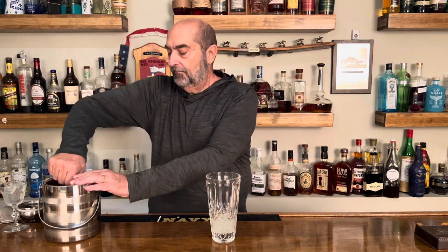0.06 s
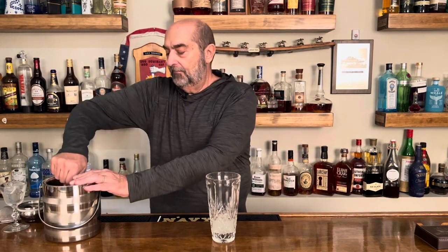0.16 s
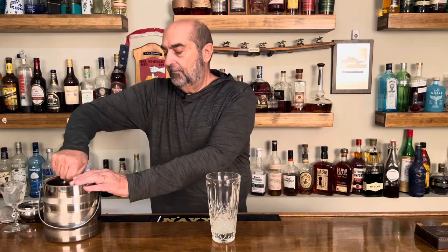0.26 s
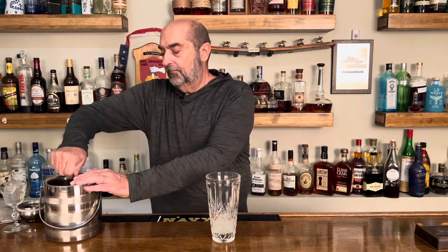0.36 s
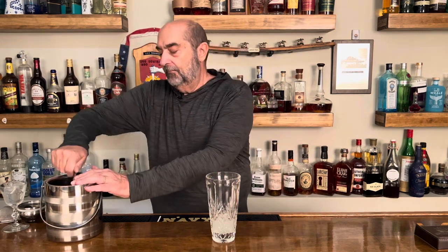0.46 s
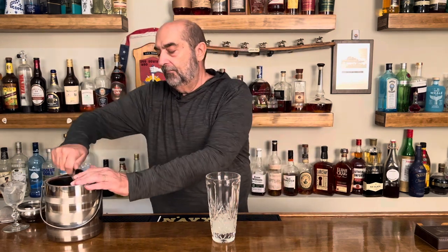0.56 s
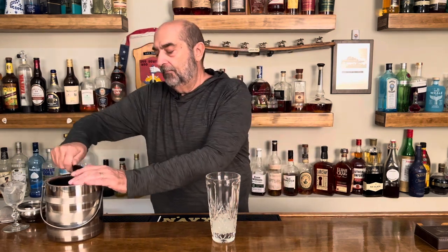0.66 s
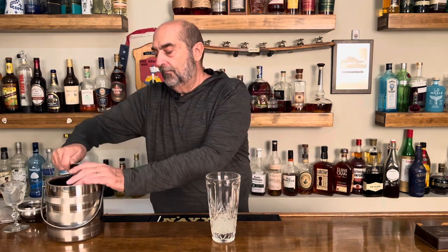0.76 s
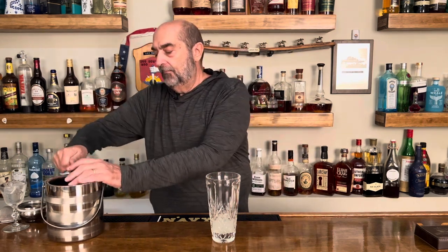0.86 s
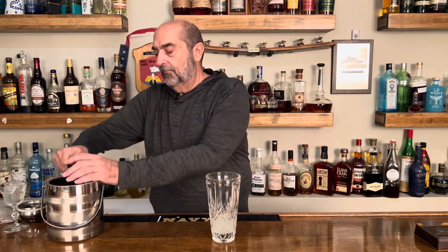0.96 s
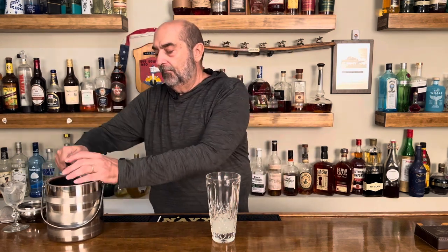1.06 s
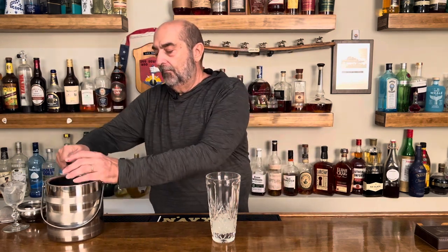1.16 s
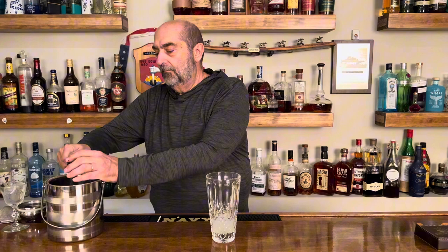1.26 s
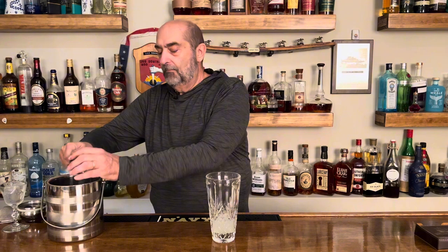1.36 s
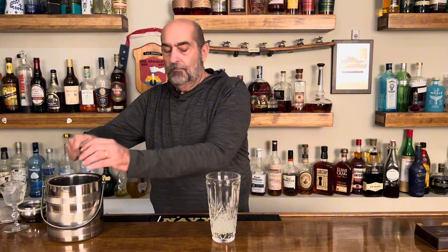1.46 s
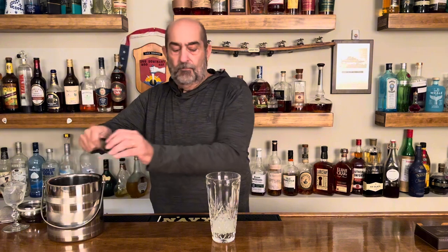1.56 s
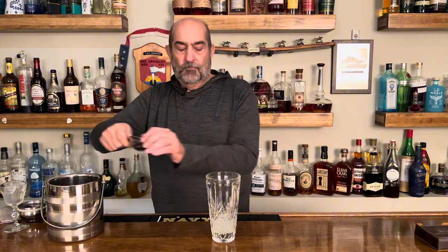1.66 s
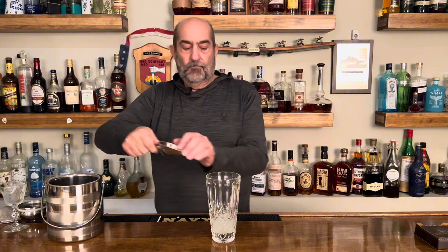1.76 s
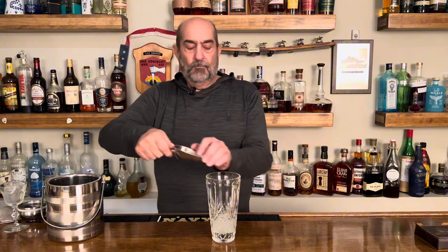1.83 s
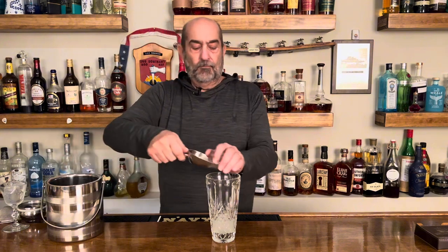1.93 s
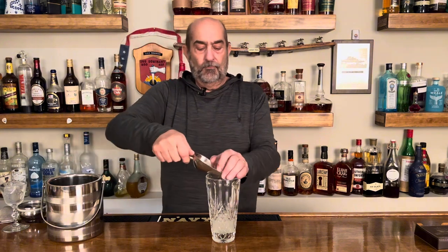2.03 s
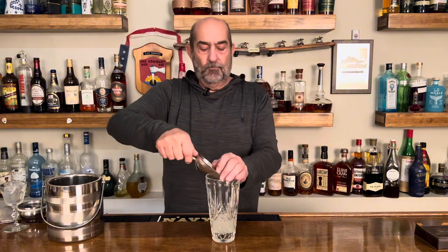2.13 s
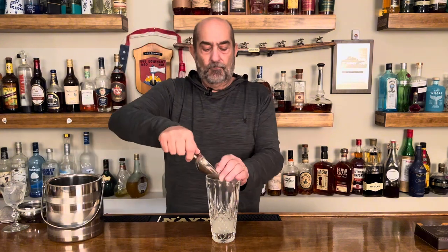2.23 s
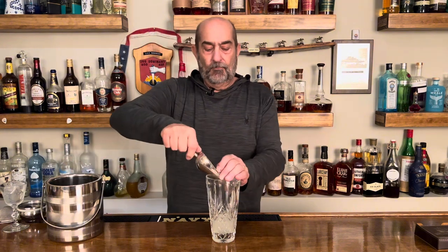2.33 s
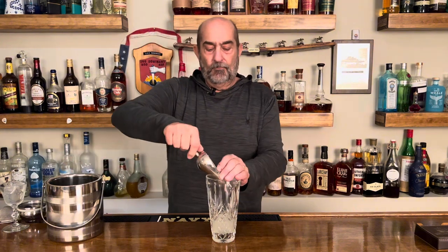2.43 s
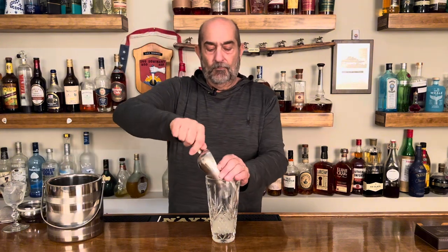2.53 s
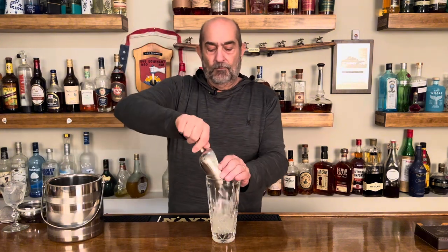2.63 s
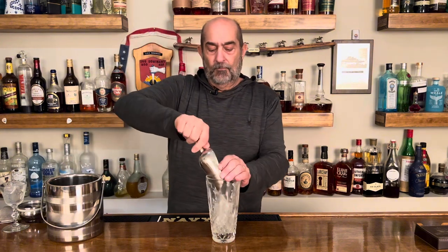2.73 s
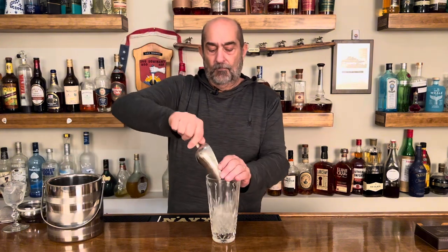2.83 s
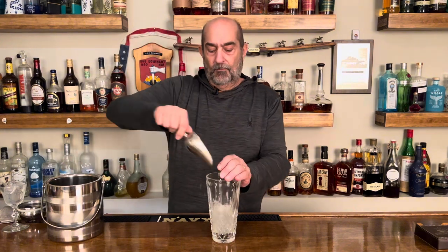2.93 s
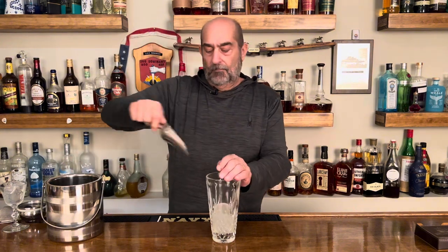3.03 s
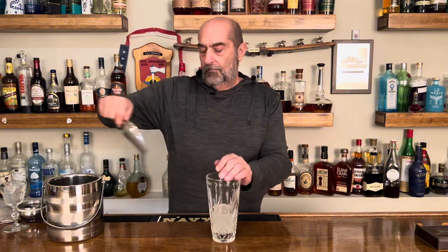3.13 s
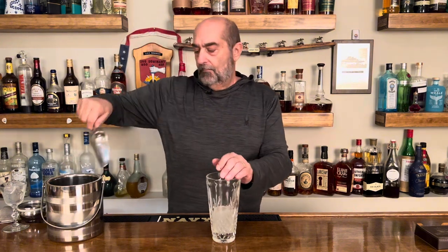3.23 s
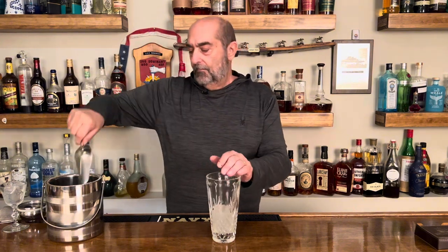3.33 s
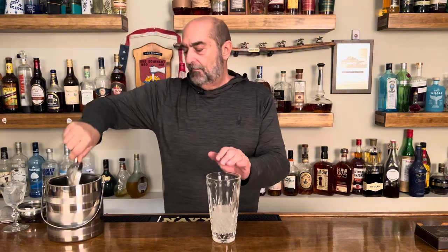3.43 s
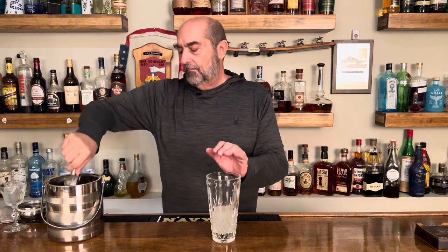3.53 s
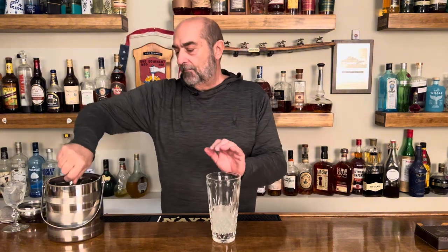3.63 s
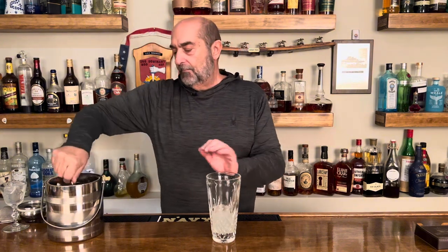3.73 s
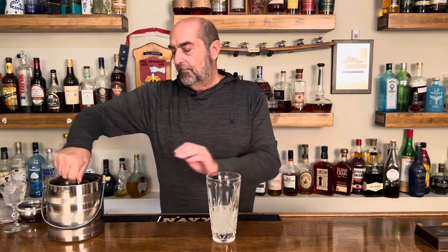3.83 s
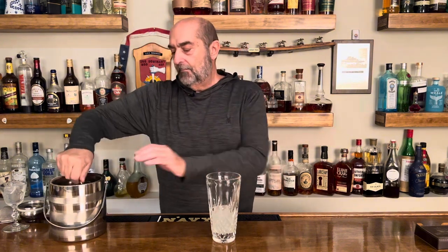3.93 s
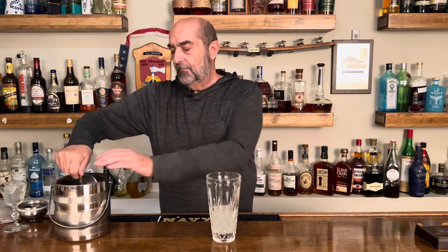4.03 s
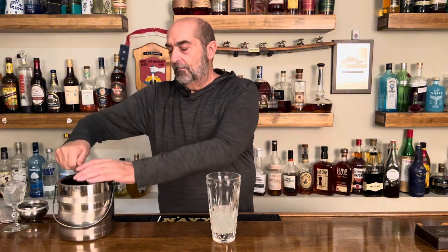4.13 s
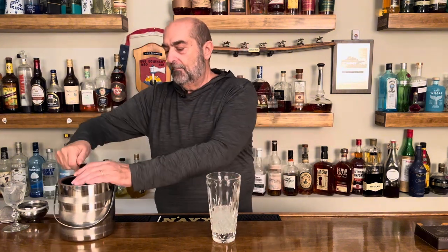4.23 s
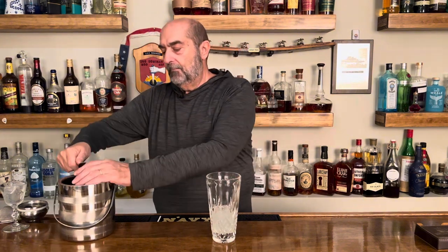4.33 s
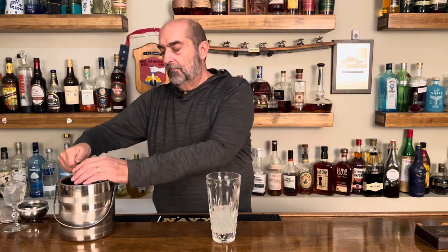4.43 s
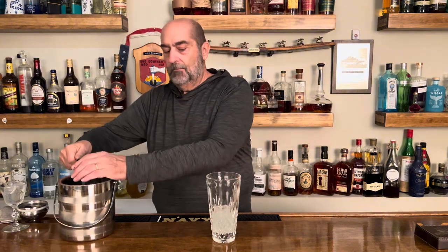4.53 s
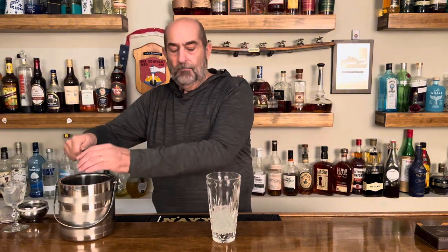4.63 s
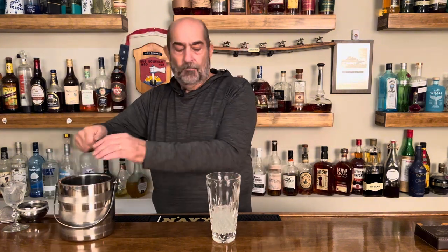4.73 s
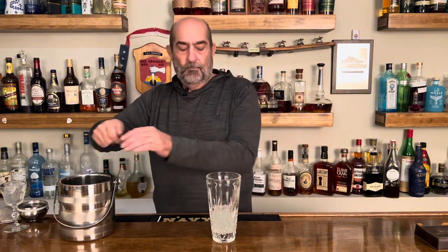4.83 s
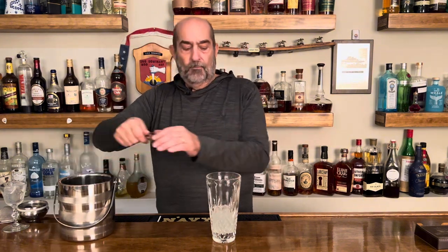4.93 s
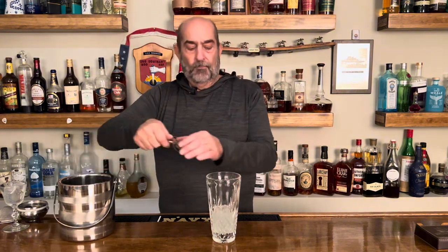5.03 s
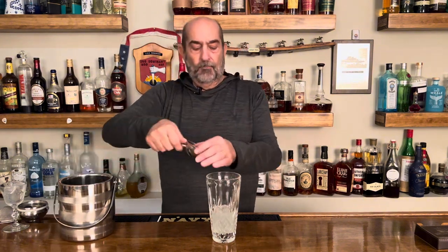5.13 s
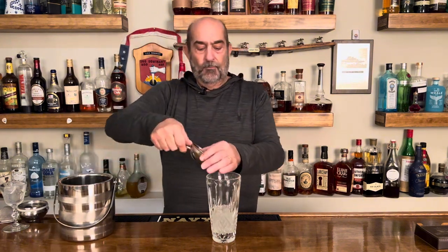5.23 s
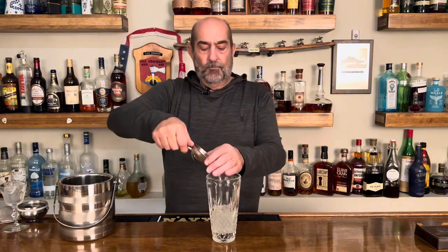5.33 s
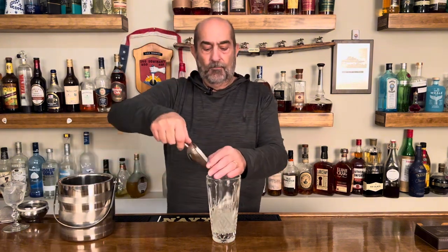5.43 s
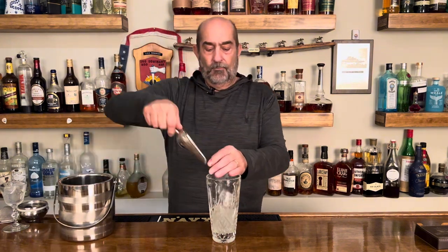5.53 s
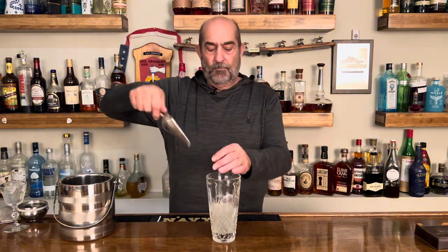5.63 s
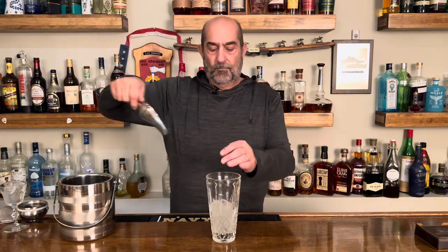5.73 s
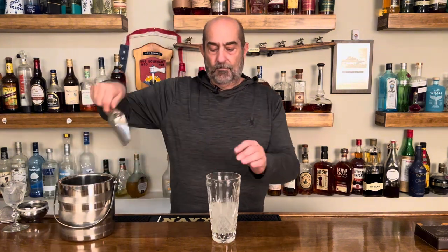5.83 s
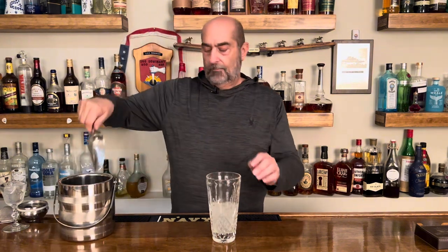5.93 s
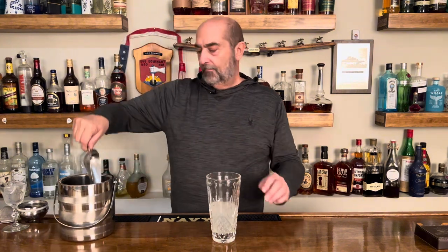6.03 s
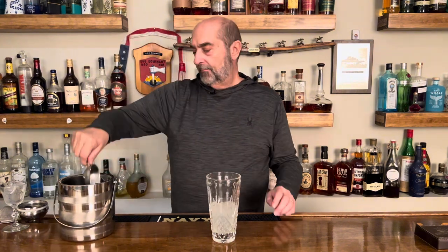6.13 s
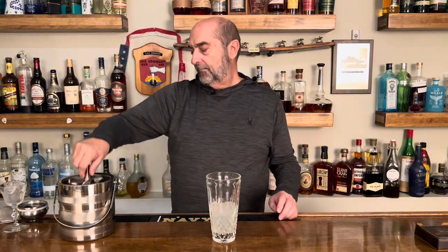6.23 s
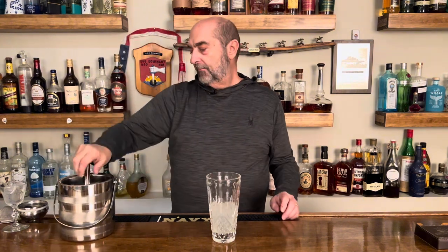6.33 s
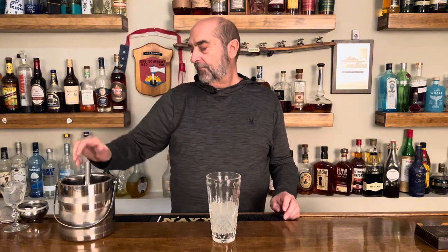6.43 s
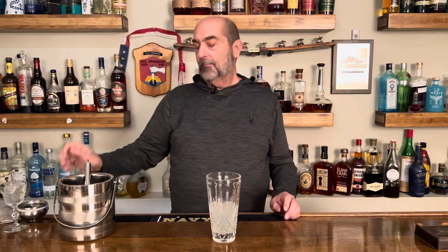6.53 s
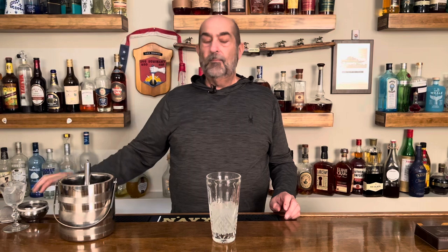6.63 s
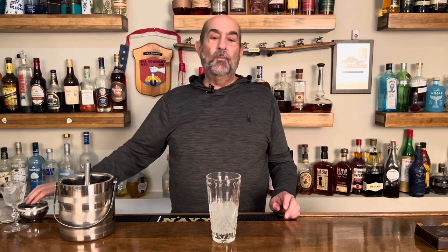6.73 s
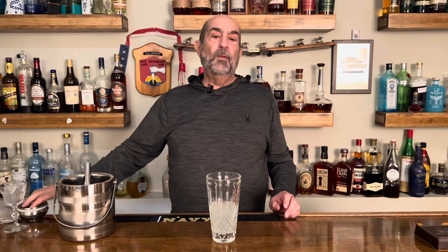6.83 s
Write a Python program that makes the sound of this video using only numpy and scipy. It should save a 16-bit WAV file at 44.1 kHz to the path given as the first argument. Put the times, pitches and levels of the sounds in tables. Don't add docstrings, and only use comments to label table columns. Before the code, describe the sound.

Ice cubes crack and rattle in a metal bucket off to one side, with low thuds through a wooden counter. After a short quiet swing, they slip off the scoop into a ringing glass almost in front. The dig and pour repeat, louder, then the steel scoop clatters into the bucket and rings briefly. Quiet room tone, short live echoes, two spaced microphones.

```python
import sys
import numpy as np
from scipy import signal
from scipy.fft import rfft, irfft, next_fast_len
from scipy.io import wavfile
from scipy.ndimage import map_coordinates

SR = 44100
rng = np.random.default_rng(int(sys.argv[2]) if len(sys.argv) > 2 else 0)


def attenuation_scalar(level_db):
    decades = np.asarray(level_db, float) / 20
    return 10 ** decades


def pcm_store(signal):
    levels = np.round(np.clip(np.atleast_2d(signal), -1, 1) * 32767)
    wavfile.write(sys.argv[1], SR, levels.astype(np.int16).T)


N = 303849
THUD_T60_S = 0.23
STEEPENS = 1.7
LATE_DB, LATE_T60_S = -27, 0.84
CEILING = .95

# t/s, crack level/dB, then clack and boom level/dB relative to the crack
FIRST_DIG = [(0.0014, -18.5, 0.5, 8), (0.0345, -40, 10, 13), (0.0826, -25, 1.5, 9),
             (0.1746, -25.5, 4.5, 12), (0.2474, -46, 19, 21), (0.3101, -37, 5, 3), (0.3441, -34, -4, -19.5),
             (.681, -25, -5, -9), (.6865, -21, -8, -12), (.702, -20.5, -16, -16.5), (.72, -27, -15, -18),
             (.745, -33.5, -10, -13), (1.062, -45, -9, -32), (1.073, -33.5, -9.5, -12),
             (1.2697, -62.5, 9.5, 18)]
SECOND_DIG = [(3.3999, -28, -7, -5), (3.474, -30, 0.5, 17), (3.495, -21.5, -9, -6),
              (3.5435, -21, -3.5, 7.5), (3.6026, -18, 3.5, -10.5), (3.6292, -22, -23, -5),
              (3.6897, -21, -7.5, -15), (3.716, -22, 4.5, -18), (3.7918, -16.5, -1.5, -18),
              (3.8185, -14.5, -8.5, -14.5), (3.8342, -19, -6, 2), (3.9214, -42.5, 0, 17),
              (3.9675, -34, 7.5, 13), (4.019, -35.5, 10, 9.5), (4.144, -35.5, 0.5, 4),
              (4.151, -23.5, -2.5, 2.5), (4.162, -28, -2, 2.5), (4.2578, -44.5, 13, 2),
              (4.337, -38.5, 5.5, -8), (4.3797, -24, -12.5, -20)]
SCOOP_DROP = [
    (6.0575, -28, -3, 3),
    (6.1865, -29.5, -4.5, 17),
    (6.2501, -13, -5, 11.5),
    (6.2782, -19.5, -35.5, -6.5),
    (6.3104, -22.5, -2.5, 11.5),
    (6.3327, -15.5, -2, -1.5),
    (6.3453, -14, -6.5, -12.5),
    (6.8154, -50.5, -15.5, -21.5),
    (6.8682, -33, 0, 10),
]
GLASS_HITS = [(2.129, -33, 4, 12), (2.2008, -40.5, 3.5, 7.5), (2.5031, -49.5, 2, -13),
              (2.554, -37, 5.5, -6), (2.593, -27.5, -19, -1), (2.609, -23.5, -3, -9),
              (2.6834, -48.5, 20, 5), (2.702, -50, 18, 8), (2.735, -52, 20, 8), (2.77, -55, 16, 8),
              (2.815, -54, 16, 5), (2.855, -56, 15, 5), (2.7187, -59.5, 30.5, 10), (2.751, -63, 25, 6),
              (2.7927, -35, 2, -24), (2.9002, -45.5, -2.5, -15), (2.927, -44.5, -13, -12),
              (3.0168, -69, 26, 29.5), (3.0794, -73, 33, 6), (5.2051, -57, 7, -12),
              (5.2611, -48, 7.5, -23.5), (5.3425, -27.5, -9.5, -9), (5.427, -17.5, -10, -17.5),
              (5.4703, -16.5, -25, -28), (5.5079, -24.5, -13, -19), (5.5503, -27, -6, -17),
              (5.5975, -38, 11.5, -6), (5.6702, -47, 12, 9), (5.7153, -51, 8.5, -2), (5.76, -58, 8, -0.5),
              (5.8076, -55, 5.5, -5), (2.0055, -65, 9.5, 0), (2.068, -69.5, 8, 0), (2.467, -63, -1, -10)]
# t/s, level/dB
BUCKET_THUDS = [(.0014, -22), (0.034, -37.5), (0.0813, -20), (3.4008, -33.5), (3.474, -19), (3.6063, -8.5),
                (3.6273, -20), (6.0584, -32.5), (6.1862, -21.5), (6.25, -14.5), (6.3113, -19.5),
                (6.3306, -25.5), (6.3454, -26), (6.8707, -41)]
GLASS_THUDS = [(2.004, -50.5), (2.129, -22), (2.2006, -27), (2.5053, -39.5), (2.594, -27.5),
               (2.6812, -22.5), (2.7196, -30.5), (5.343, -37.5), (5.427, -22.5), (5.5077, -23),
               (5.5506, -31), (5.597, -22), (5.7207, -38)]
# peak t/s, crunch level/dB, rise/s, fall/s (each over 20 dB), rumble level/dB relative
DIG_STROKES = [
    (.03, -35, 0.3, 0.37, 7.5),
    (.27, -39.5, 0.54, 0.1, -1),
    (3.612, -28.5, 0.11, 0.19, 6),
    (3.74, -29, .1, .1, -5),
    (3.82, -21.5, .07, .075, -9),
    (3.94, -35, .12, .15, -4),
    (4.15, -39.5, 0.033, 0.21, 0),
    (6.19, -33, .012, .2, 6.5),
    (6.29, -43.5, 0.099, 0.25, 10.5),
]
POUR_STROKES = [
    (2.73, -50, .2, 0.22, 7),
    (5.34, -48.5, 0.13, 0.18, -14),
    (5.5, -40, 0.15, 0.18, -4),
    (5.558, -36, .2, .07, -15),
    (5.74, -50, .08, .14, -8),
]
# t/s, f/Hz, level/dB, t60/s,
# damped after/s
BUCKET_NOTES = [(.002, 513, -16.5, .11, .025), (0.28, 510, -24.5, 0.18, .042), (.175, 1248, -27.5, .2, .15),
                (1.073, 3720, -39, 0.046, .015), (1.073, 4930, -32.5, 0.042, .02),
                (1.073, 5400, -33, .03, .02), (.687, 3670, -20, .08, .03), (3.40, 3670, -42, .25, .06),
                (3.40, 4880, -40, 0.14, .06), (3.40, 5600, -37.5, 0.22, .07), (3.40, 8900, -44, .4, .08),
                (3.612, 1800, -20.5, .12, .04), (3.72, 1960, -23, 0.44, .08), (3.565, 500, -19.5, .15, .03),
                (3.905, 715, -28.5, 0.27, .05), (3.40, 715, -28, 0.25, 0.081),
                (3.40, 1670, -31.5, 0.24, 0.035), (3.604, 515, -5, 0.3, .04), (3.625, 1485, -11, 0.11, .2),
                (3.69, 568, -9.5, 1.8, .03), (3.72, 1260, -21.5, 0.49, 0.14), (3.82, 2036, -21, 0.39, 0.51),
                (3.828, 517, -13, 0.17, .07), (4.381, 4680, -26.5, 0.045, .1),
                (6.057, 5600, -46.5, 0.62, .1), (6.186, 570, -26.5, 0.86, .045), (6.251, 545, 2, 0.04, .27),
                (6.31, 538, -17, 0.21, 0.047), (6.338, 1705, 0, 0.25, 0.082), (6.42, 1707, -27, .33, .18),
                (6.36, 1950, -20, 0.29, .2), (6.252, 950, -15, .1, .02), (.002, 1250, -24, .15, 0.047),
                (.17, 3650, -28, 0.14, .03), (4.15, 530, -25.5, 0.16, 0.035), (4.26, 2200, -34, .3, .04),
                (6.333, 715, -9.5, 0.17, .07), (3.545, 550, -17, 0.17, .06), (6.869, 1140, -21, .06, .03)]
GLASS_NOTES = [(2.129, 1584, -27, 0.11, .025), (2.554, 2262, -21.5, .36, .1), (2.554, 2334, -20.5, .2, .08),
               (2.554, 2460, -21, .15, .06), (2.554, 4793, -28, 0.093, .05), (2.554, 5750, -34.5, .15, .05),
               (2.607, 2297, -19.5, 0.19, 0.02), (2.684, 2800, -22, 0.043, .15),
               (2.718, 1330, -27, 0.12, .015), (2.74, 1350, -26.5, .1, .01), (2.756, 563, -27, .15, .03),
               (2.79, 5400, -36, 0.099, .05), (2.64, 5100, -38.5, 0.24, .12), (2.70, 1400, -30, .2, 0.018),
               (2.69, 1650, -31, 0.11, .03), (2.84, 1610, -36, .1, .03), (3.013, 2310, -48, 0.46, 0.067),
               (3.08, 4750, -45, 0.056, .04), (3.08, 2315, -40, .15, .1), (2.895, 688, -35, 0.2, 0.22),
               (3.016, 670, -20, 0.69, .01), (3.034, 702, -32.5, 0.45, .04), (3.034, 650, -33.5, .4, 0.038),
               (3.12, 680, -41, 0.37, 0.054), (3.09, 2248, -39, 0.19, 0.083), (5.345, 2236, -21.5, 1.4, .3),
               (5.345, 2300, -16.5, 1.8, .19), (5.345, 5740, -20, 0.19, .07), (5.345, 5830, -29, 0.17, .05),
               (5.47, 5620, -31, .3, 0.05), (5.345, 10000, -27, .3, .074), (5.47, 8700, -37, 0.34, .08),
               (5.67, 3050, -41, .06, .02), (5.60, 2650, -31, 0.11, .04), (5.555, 2310, -14, 0.22, .5),
               (5.60, 850, -22, 0.087, 0.11), (5.72, 2250, -41.5, .4, .15),
               (2.129, 2300, -33, .12, .03), (2.129, 2780, -37, 0.13, .05), (2.129, 5114, -38, 0.13, .08),
             (2.129, 5700, -35.5, 0.32, 0.11), (2.129, 730, -33, .15, .04), (2.2008, 2304, -38, .15, .03),
             (2.2008, 519, -33, .2, .05)]
# f/Hz, level/dB, t60/s
SCOOP_RING = [(2848, -44, 1.4), (4060, -62, 1.1), (5036, -50, .6), (5647, -50, .75), (3512, -55, .55),
              (6855, -54, .5), (8333, -52, .35)]
# t/s, level/dB, damped after/s, pitch ratio as the load leaves
SCOOP_STRUCK = [
    (.685, 0, .38, 1),
    (4.381, -12, .3, 1),
    (6.34, 4, .5, 1.004),
]
# t/s, level/dB, contact time/ms
BUCKET_TAPS = [(.004, -14, .3), (3.4745, -22, .3), (3.6055, -12.5, 0.23), (3.8045, -14.5, .04),
               (3.824, -14, .04), (4.152, -20.5, .1), (4.381, -22, .04), (4.563, -50, .03),
               (6.2505, -8, 0.33), (6.3335, -7.5, .13)]
GLASS_TAPS = [(2.129, -20, .15), (2.554, -12, .09), (2.589, -28.5, .08), (2.607, -22, .06),
              (2.642, -28, .07), (2.6835, -25, .1), (3.0795, -36, .08), (5.2625, -30, .06),
              (5.3425, -18, .07), (5.428, -21, .06), (5.472, -19, .05), (5.509, -24, .2),
              (5.5525, -13.5, .06), (5.566, -23.5, .03), (5.601, -21, .15), (5.669, -30.5, .05)]
# peak t/s, level/dB, rise/s, fall/s
SLIDE = [(.66, -55.5, 0.34, 0.039), (1.304, -62, 0.17, 0.05), (1.8, -66.5, 0.42, 0.035),
         (1.866, -67, .02, 0.066), (2.006, -69, .01, 0.12), (4.766, -65.5, 0.23, 0.064),
         (5.044, -50.5, 0.072, 0.18), (5.286, -47, 0.1, 0.047), (6.86, -61, .06, 0.62)]
SLEEVE = [
    (.62, -58.5, 0.14, 0.09),
    (1.74, -66.5, 0.55, 0.13),
    (4.66, -69.5, 0.201, 0.26),
    (5.208, -54, 0.0032, .012),
]
# f/Hz, width/Hz, level/dB
BUCKET = [(1379, 350, -10.5), (1515, 73, -2), (1696, 51, 5.5), (2022, 110, 8.5), (2477, 24, -23),
          (2847, 100, -5.5), (3507, 140, -9), (3800, 110, -4), (4700, 38, -23), (4980, 60, -12),
          (5550, 60, -17.5), (6650, 40, -13.5), (8360, 90, -12)]
GLASS = [(489, 21.3, -6), (1330, 150, -24.5), (1580, 95, -27), (2300, 22, 2), (2533, 83, -1),
         (2800, 87, -17), (4945, 74, -13.5), (5780, 140, -11), (8600, 60, -32)]
COUNTER = [(59, 130, -4.5), (106, 15, 3.5), (148, 16.7, 3.5), (193.2, 29.4, 4), (241.4, 56, -4.5),
           (370, 40, -3), (503.7, 96, -3.5), (717, 4.7, -5)]
# low f/Hz, high f/Hz
BANDS = [(2800, 16000), (850, 2800), (380, 850), (70, 380)]
# f/Hz, level/dB per Hz
DIG_COLOUR = [(410, -28.5), (700, -3), (1010, -4), (1500, -4), (5690, 2), (11400, -14), (13000, -8.5),
              (16000, -34)]
POUR_COLOUR = [(410, -63), (700, -0.5), (1300, -10), (1600, 2), (4990, 0.5), (8650, -18), (10700, -32),
               (16000, -49)]
SCOOP = [(240, -77), (500, -41), (791, -23), (1660, -2), (5600, -27.5), (10600, -52), (11600, -36),
         (15000, -45)]
CLOTH = [(1500, -32), (5000, 0), (14000, 1.5)]
# f/Hz, level/dB
LEFT = [(200, -6), (1000, 10.5), (2500, -2), (5000, 20), (9000, 5.5), (13000, 4.5)]
GLASS_LEFT = [(200, -3.5), (700, 2.5), (1300, 4), (2300, -1.5), (5000, 13.5), (9000, 4), (13000, 2.5)]
# f/Hz, t60/s
ROOM = [(120, 0.14), (500, 0.33), (2000, 0.31), (6000, 0.34), (14000, 0.15)]
# f/Hz, level/dB per Hz
AIR = [(35, -18), (60, 5.5), (110, 0), (170, -7.5), (300, -12.5), (650, -25), (2000, -28), (3200, -36)]
AIR_TOP = [(3200, 0), (5000, -4), (8000, -10), (10000, -16), (12500, -14), (16000, -28)]
# f/Hz, likeness (1 = same)
AIR_ALIKE = [(60, 0.37), (180, 0.46), (550, -0.4), (1650, -0.24), (4970, -0.66), (15000, 1)]
# f/Hz, level/dB
HUM = [(119, -54), (160, -78.5), (900, -75)]
# f/Hz, level/dB
MIC = [(30, -14), (90, -4), (9900, 1), (10150, -13.5), (10900, -17.5), (11200, 2), (14500, 5.5), (15300, 2),
       (16400, -24.5)]
WIDTH = [(60, -8.5), (150, -9.5), (300, 0), (2000, 2), (9000, -0.5), (11000, 11), (13000, -9.5)]


def blows(hits, thuds, modes, ring_db, damping, dull_hz, crack_t60):
    bands, rings, t = np.zeros((4, N)), np.zeros(N), np.arange(SR // 4) / SR
    hz, width, level = np.transpose(modes)[:, :, None]
    t60 = 2.2 / (damping * np.clip(width, 30, 90))
    swell = 1 - np.exp(-t / .002)
    for s, db, clack_db, boom_db in hits:
        for band, rel_db, slower in zip(bands, (0, clack_db, boom_db), (1, 1.3, 2.2)):
            fall = attenuation_scalar(db + rel_db - 60 * t / (slower * crack_t60))
            add(band, s, fall * swell * rng.standard_normal(len(t)))
        push = along([(600, boom_db), (1500, clack_db), (4000, 0.031)], hz) + rng.normal(0, 3.1, hz.shape)
        wander = .085 * np.cumsum(rng.standard_normal((len(hz), len(t))), axis=1)
        strength = attenuation_scalar(db + ring_db + .5 * level + push - 60 * t / t60)
        add(rings, s, np.sum(strength * np.sin(2 * np.pi * hz * t + wander), axis=0))
    for s, db in thuds:
        add(bands[3], s, attenuation_scalar(db - 60 * t / THUD_T60_S) * swell * rng.standard_normal(len(t)))
    bands[0] = filtered(bands[0], lambda f: 0.92 / (1 + 1j * f / dull_hz))
    bands[2:] = filtered(bands[2:], resonances(COUNTER))
    total = rings
    for (low, high), band in zip(BANDS, bands):
        band_pass = signal.butter(2, (low, high), "band", fs=SR, output="sos")
        total = total + np.sqrt(SR / 2 / (high - low)) * signal.sosfilt(band_pass, band)
    return total


def crunch(rows, colour, modes, per_second, spread_db, ring_db):
    force = strokes(rows)
    sizes = attenuation_scalar(np.minimum(spread_db * rng.exponential(size=N), 12))
    ticks = (rng.random(N) < per_second / SR) * sizes
    grains = unit(signal.lfilter([1], [1, -.99], ticks) * rng.standard_normal(N))
    rattle = grains + .6 * unit(clinks(count=2400))
    vessel = resonances(modes)
    high = unit(filtered(rattle, lambda f: attenuation_scalar(along(colour, f)) * (1 + attenuation_scalar(ring_db) * vessel(f))))
    low = unit(filtered(grains, resonances(COUNTER)))
    rumble = attenuation_scalar(np.transpose(rows)[4])[:, None] * force
    return force.max(axis=0) * high + rumble.max(axis=0) * low


def clinks(count):
    start, pitch, size = rng.random((count, 3)).T[:, :, None]
    k = np.arange(2048)
    hz = 600 * 10 ** pitch
    tones = attenuation_scalar(-14 * size - 60 * k / SR / .05) * np.sin(2 * np.pi * hz * k / SR)
    return np.bincount(((start * N).astype(int) + k).ravel(), tones.ravel(), N)[:N]


def notes(rows, attack_s, blur):
    out, t = np.zeros(N), np.arange(SR // 2 + 4000) / SR
    for s, hz, db, t60, held in rows:
        fall = 60 * t / t60 + 60 * np.maximum(t - held, 0) / 0.043
        knots = 20 + int(hz ** 2 / 1e5)
        drift = wobble(count=len(t), knots=knots) + 1j * wobble(count=len(t), knots=knots)
        neighbours = blur * min(1 + (hz / 2500) ** 2, 4) ** .5 * drift
        tone = np.imag((1 + neighbours) * np.exp(2j * np.pi * hz * t))
        add(out, s, attenuation_scalar(db - fall) * (1 - np.exp(-t / attack_s)) * tone)
    return out


def scoop_ring():
    rows = []
    for s, db, held, ratio in SCOOP_STRUCK:
        for hz, level, t60 in SCOOP_RING:
            rows.append((s, ratio * hz, db + level, t60, held))
    return notes(rows, attack_s=.006, blur=.07)


def taps(rows):
    out = np.zeros(N)
    for s, db, contact_ms in rows:
        u = np.arange(256) / SR / (contact_ms / 1000)
        add(out, s, attenuation_scalar(db) * (1 - u) * np.exp(-u) * np.minimum(4 * u, 1))
    return out


def slide(rows, colour):
    flutter = attenuation_scalar(1.9 * wobble(count=N, knots=280))
    hiss = unit(filtered(rng.standard_normal(N), lambda f: attenuation_scalar(along(colour, f))))
    return strokes(rows).max(axis=0) * flutter * hiss


def bucket():
    clatter = blows(FIRST_DIG + SECOND_DIG + SCOOP_DROP, BUCKET_THUDS, BUCKET,
                    ring_db=-6.5, damping=1.04, dull_hz=9600, crack_t60=0.058)
    clatter = clatter + crunch(DIG_STROKES, DIG_COLOUR, BUCKET, per_second=700, spread_db=-5.0, ring_db=7.5)
    tones = notes(BUCKET_NOTES, attack_s=.0012, blur=.18) + taps(BUCKET_TAPS)
    return placed(clatter, tones, LEFT, lead_s=.00018, wet_db=3.5, tone_share=.25)


def glass():
    clatter = blows(GLASS_HITS, GLASS_THUDS, GLASS, ring_db=-0.5, damping=0.97, dull_hz=5400, crack_t60=0.048)
    clatter = clatter + crunch(POUR_STROKES, POUR_COLOUR, GLASS, per_second=620, spread_db=0.0, ring_db=-28)
    clatter = clatter + slide(SLIDE, SCOOP) + slide(SLEEVE, CLOTH)
    tones = notes(GLASS_NOTES, attack_s=.001, blur=.16) + scoop_ring() + taps(GLASS_TAPS)
    return placed(clatter, tones, GLASS_LEFT, lead_s=.00005, wet_db=2.5, tone_share=0.33)


def placed(clatter, tones, left, lead_s, wet_db, tone_share):
    side = np.array([[.5], [-.5]])
    pair = lambda f: attenuation_scalar(side * along(left, f)) * np.exp(2j * np.pi * f * side * lead_s)
    return filtered(clatter + tones, pair) + room(clatter + tone_share * tones, wet_db)


def room(x, wet_db):
    out, hop = np.zeros((2, N + 2 * SR)), 8192
    fade = np.hanning(2 * hop + 1)[:-1]
    padded = np.pad(x, (hop, 2 * hop))
    for k in range(0, N + hop, hop):
        hz, t, z = signal.stft(rng.standard_normal((2, SR // 2)), SR, nperseg=256)
        decay = attenuation_scalar(-60 * t / along(ROOM, hz)[:, None]) + attenuation_scalar(LATE_DB - 60 * t / LATE_T60_S)
        tail = signal.istft(z * decay, SR, nperseg=256)[1]
        tail[0] += 0.091 * tail[1]
        tail = tail / np.linalg.norm(tail, axis=1)[:, None]
        wet = signal.fftconvolve((fade * padded[k:k + 2 * hop])[None], tail, axes=1)
        out[:, k:k + wet.shape[1]] += wet
    return attenuation_scalar(wet_db) * out[:, hop - 130:hop - 130 + N]


def kitchen_air():
    turn = lambda f: np.arccos(np.clip(along(AIR_ALIKE, f), -1, 1)) / 2
    colour = lambda f: attenuation_scalar(along(AIR, f) + along(AIR_TOP, f))
    noise = rng.standard_normal((2, N))
    mid, side = filtered(noise, lambda f: colour(f) * np.array([np.cos(turn(f)), np.sin(turn(f))]))
    slow_swell = attenuation_scalar(1.2 * wobble(count=N, knots=24))
    t = np.arange(N) / SR
    hum = np.zeros(N)
    for hz, db in HUM:
        level = attenuation_scalar(db + 2.5 * wobble(count=N, knots=80))
        hum += level * np.sin(2 * np.pi * hz * t + .6 * wobble(count=N, knots=80))
    return attenuation_scalar(-53) * slow_swell * unit(np.array([mid + side, mid - side])) + hum


def strokes(rows):
    peak_s, db, rise_s, fall_s = np.transpose(rows)[:4, :, None]
    late = np.arange(N) / SR - peak_s
    return attenuation_scalar(db - 20 * np.maximum(late / fall_s, -late / rise_s) ** STEEPENS)


def resonances(peaks):
    def response(f):
        total = 0
        for k, (centre, width, db) in enumerate(peaks):
            loss = 1j * f * width
            total = total + (-1) ** k * attenuation_scalar(db) * loss / (centre * centre - f * f + loss)
        return total
    return response


def filtered(x, response):
    m = next_fast_len(N + SR // 2)
    return irfft(rfft(x, m) * response(np.fft.rfftfreq(m, 1 / SR)), m)[..., :N]


def along(points, hz):
    f, v = np.transpose(points)
    return np.interp(np.log(hz + 1), np.log(f + 1), v)


def wobble(count, knots):
    return map_coordinates(rng.standard_normal(knots + 4), [np.linspace(0, knots, count)])


def unit(x):
    return x / np.sqrt(np.mean(x ** 2) + 1e-20)


def add(track, s, piece):
    part = track[round(s * SR):][:len(piece)]
    part += piece[:len(part)]


def scene():
    return attenuation_scalar(-4.0) * (bucket() + glass()) + kitchen_air()


def low_pass(x):
    return signal.sosfilt(signal.butter(12, 16540, fs=SR, output="sos"), x)


def record(dry):
    middle_and_side = np.array([dry[0] + dry[1], dry[0] - dry[1]]) / 2
    widen = lambda f: np.array([np.ones_like(f), attenuation_scalar(along(WIDTH, f))])
    mid, side = filtered(middle_and_side, lambda f: attenuation_scalar(along(MIC, f)) * widen(f))
    pair = np.array([mid + side, mid - side])
    mix = pair / (1 + np.abs(pair / CEILING) ** 6) ** (1 / 6)
    return low_pass(mix)


dry = scene()
out = record(dry)
pcm_store(out)
```